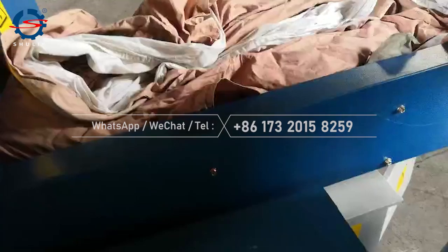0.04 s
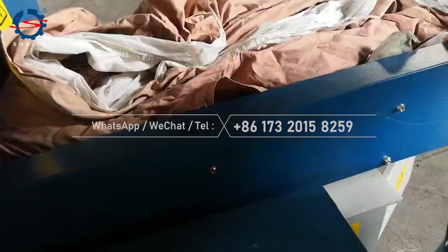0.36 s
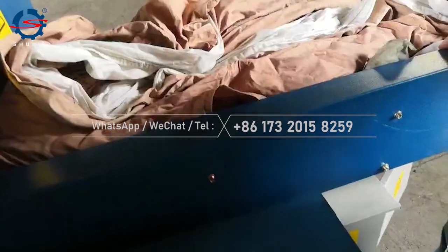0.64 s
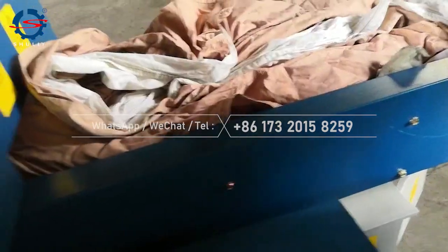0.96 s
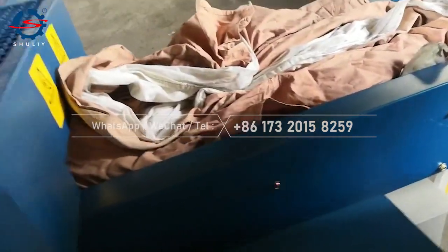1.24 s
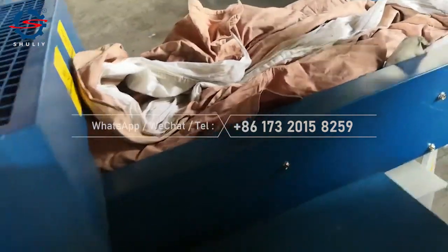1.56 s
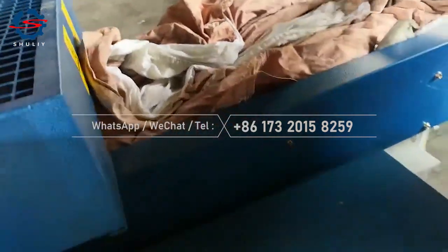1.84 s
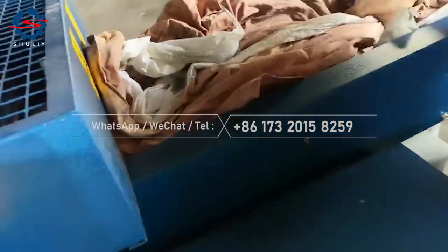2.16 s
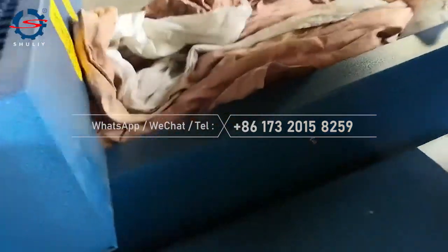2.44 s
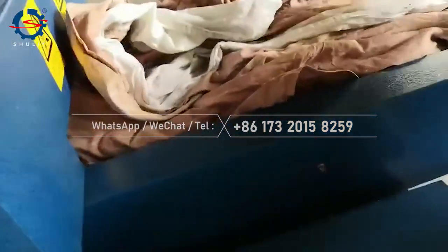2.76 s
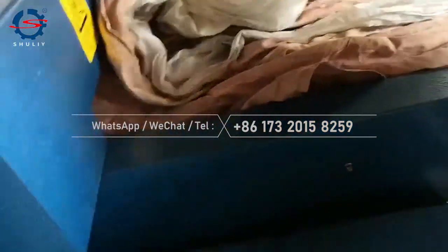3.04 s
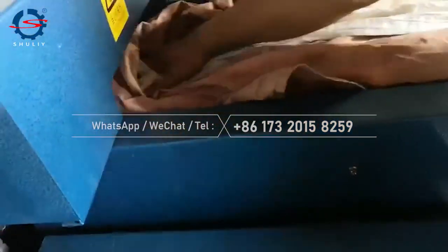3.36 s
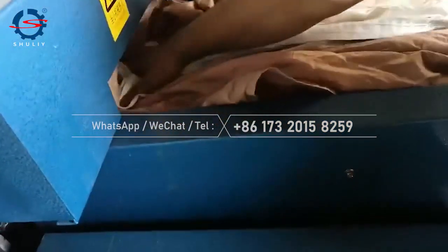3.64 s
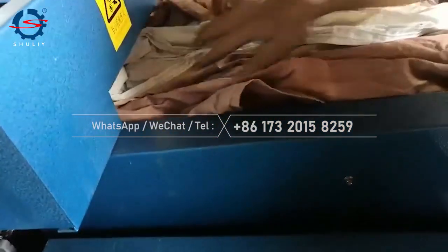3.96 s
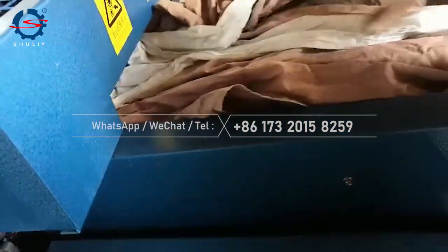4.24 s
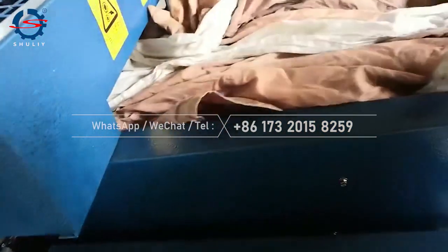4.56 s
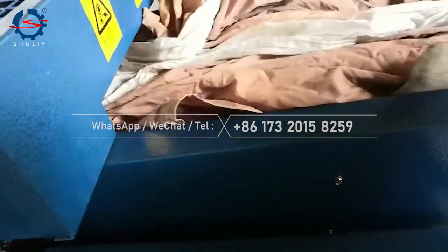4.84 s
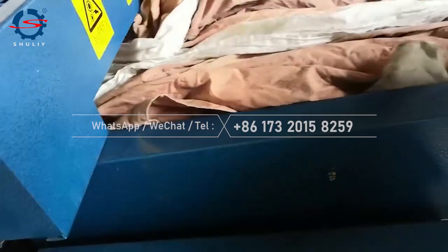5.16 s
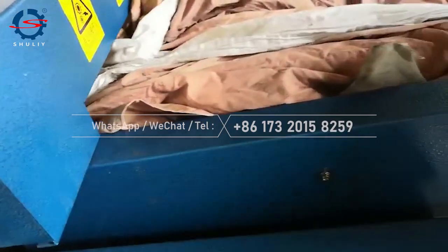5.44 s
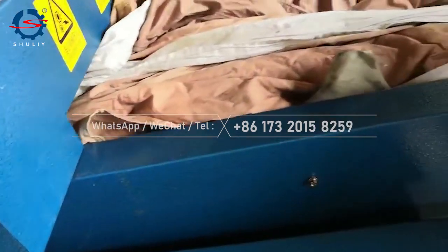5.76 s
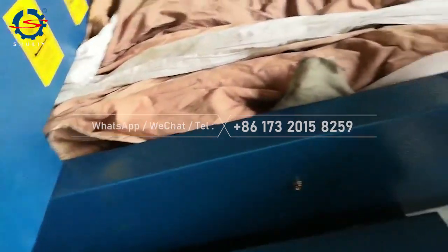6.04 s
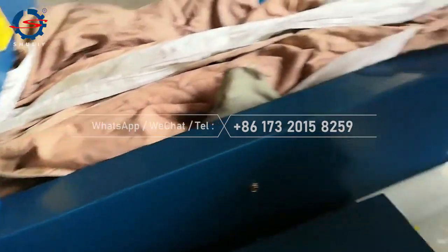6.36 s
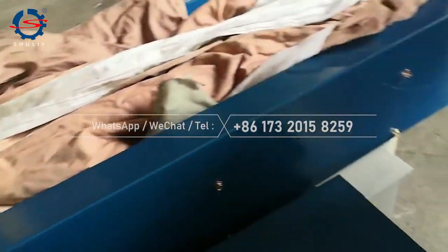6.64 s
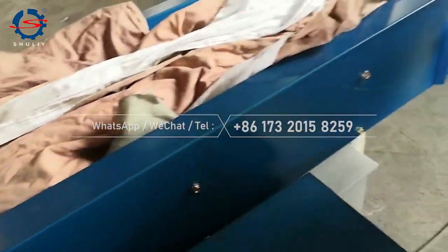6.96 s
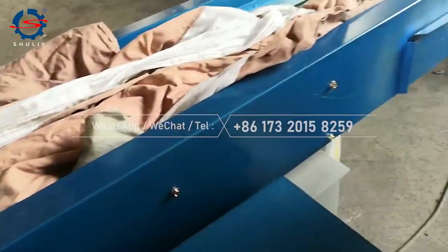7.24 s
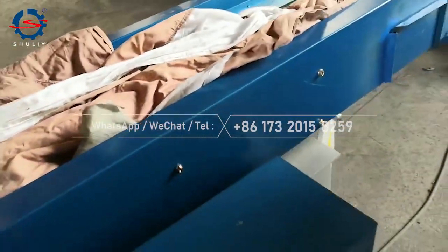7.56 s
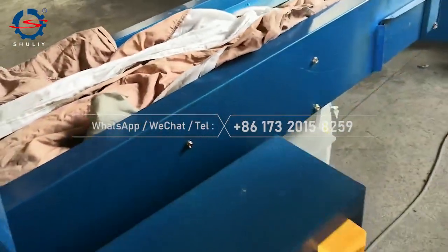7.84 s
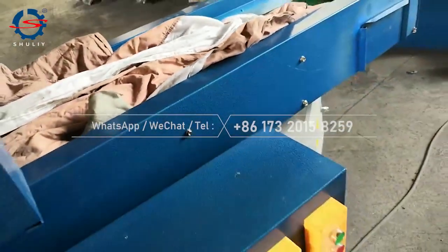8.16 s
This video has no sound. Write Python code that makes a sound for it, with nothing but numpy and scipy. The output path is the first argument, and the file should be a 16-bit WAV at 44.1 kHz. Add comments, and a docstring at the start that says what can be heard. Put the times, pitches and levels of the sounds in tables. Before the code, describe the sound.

Rapid, regular blade chops with a ringing scrape, over the rumble and gear clatter of a rag cutter in a workshop.

```python
"""A rag chopper rumbles and knocks in a workshop, its knife chopping almost four times a second.
The drive knocks six times a turn in the steel housing; gears and conveyor rattle much alike on every turn.
The rotating knife shears past the bed knife with a clunk and a scrape, and both blades ring.
Near the end a pulsing belt hiss comes close."""
import sys
import numpy as np
from scipy import signal
from scipy.fft import rfft, irfft
from scipy.io import wavfile
from scipy.ndimage import uniform_filter1d, minimum_filter1d

SR = 44100
rng = np.random.default_rng(int(sys.argv[2]) if len(sys.argv) > 2 else 0)


def generate_wav(sig):
    """Save sig (samples, or channels by samples) to the path in sys.argv[1] as 16-bit PCM at SR."""
    pcm = np.round(np.clip(np.atleast_2d(sig).T, -1, 1) * 32767).astype(np.int16)
    wavfile.write(sys.argv[1], SR, pcm)


N = 361179
TIME, FREQS = np.arange(N) / SR, np.fft.rfftfreq(N, 1 / SR)

# knife shaft, slowing slightly at the end: t/s, angle/turns
SHAFT_ANGLE = [(-.1323, 0), (7.0912, 28), (7.6095, 30), (8.396, 33)]
TURNS = np.interp(TIME, *np.transpose(SHAFT_ANGLE))
TURN_S = .258  # nominal period
CUT_TIMES_S = np.interp(np.arange(1, TURNS[-1]), TURNS, TIME)


def gain_of(db):
    """Decibels to amplitude."""
    return 10 ** (np.asarray(db) / 20)


def unit_rms(x):
    """Scales to rms 1."""
    return x / np.sqrt(np.mean(x ** 2) + 1e-20)


def along(points):
    """A (t/s, value) curve at every sample."""
    return np.interp(TIME, *np.transpose(points))


def spectrum(points):
    """Gain at every frequency from (f/Hz, level/dB) points."""
    hz, db = np.transpose(points)
    return gain_of(np.interp(np.log(FREQS + 1), np.log(hz), db))


def resonances(modes):
    """Response of (f/Hz, width/Hz, level/dB) modes, each radiating only around its own pitch."""
    response = 0
    for hz, width_hz, db in modes:
        detune = (FREQS + 1) / hz - hz / (FREQS + 1)
        response += gain_of(db) / ((1 + 1j * detune * hz / width_hz) * (1 + 2j * detune) ** 2)
    return response


def colour(x, response):
    """Filters by a frequency response."""
    return irfft(rfft(x) * response, N)


def slack(load_exponent=2.03, release_turns=.047):
    """Near 1 just after a cut, falling to 0 as the drive takes up load for the next."""
    angle = TURNS % 1
    return (1 - angle) ** load_exponent * np.minimum(angle / release_turns, 1)


def press(at_turns=.886, width_turns=.048):
    """Knife pressure on the cloth, 0-1: a short swell before each cut."""
    return np.exp(-((TURNS % 1 - at_turns) / width_turns) ** 2)


def throb(per_turn, lag_turns):
    """Cosine locked to the knife shaft."""
    return np.cos(2 * np.pi * per_turn * (TURNS - lag_turns))


def shaft_tone(hz, waver):
    """Wavering tone on the shaft harmonic nearest hz."""
    knots = np.linspace(0, TIME[-1], num=24)
    drift = np.array([np.interp(TIME, knots, row) for row in rng.standard_normal((2, len(knots)))])
    phase = 2 * np.pi * (round(hz * TURN_S) * TURNS + rng.random())
    return (1 + waver * drift[0]) * np.cos(phase) + waver * drift[1] * np.sin(phase)


def contact(repeat, wear_s=3, wobble_s=.00006):
    """Mid/side roughness of meeting parts; the power share `repeat` recurs each turn, slowly shifting."""
    size = round(TURN_S * SR)
    knots = TIME[::200]
    wobble = np.interp(TIME, knots, wobble_s * rng.standard_normal(len(knots)))
    angle = TURNS % 1 + wobble / TURN_S  # shaft wobble: the treble never repeats
    patterns = unit_rms(irfft(np.exp(2j * np.pi * rng.random((2, 2, size // 2 + 1))), size))
    first, second = patterns[..., (angle * size).astype(int) % size]
    recurring = first * np.cos(TIME / wear_s) + second * np.sin(TIME / wear_s)
    return np.sqrt(repeat) * recurring + np.sqrt(1 - repeat) * rng.standard_normal((2, N))


def room(x, t60_s, wet_db):
    """Adds a diffuse workshop tail to mid and side."""
    t = TIME[:SR]
    tail = rng.standard_normal((2, SR)) * gain_of(-60 * t / t60_s) * (t > .004)
    tail /= np.linalg.norm(tail[0])
    return x + gain_of(wet_db) * signal.fftconvolve(x[:1], tail, axes=1)[:, :N]


# stereo width: f/Hz, side minus mid/dB
SIDE_GAIN = [(60, -54), (110, -27), (200, -15), (370, -4.5), (600, -4), (1200, -1.5), (3500, -0.5),
             (14000, 1)]
def stereo(x):
    """Mid/side to left/right; the bass is nearly mono."""
    side = colour(x[1], spectrum(SIDE_GAIN))
    return np.array([x[0] + side, x[0] - side])


# hiss density: f/Hz, level/dB
BELT_SPECTRUM = [(110, -17), (180, 32.5), (240, -3), (320, 17.5), (700, 3), (1000, 8), (2200, 14.5),
                 (3200, -1.5), (5300, -1.5), (6800, -3), (9500, -4), (12000, -22.5), (15000, -30)]
# belt coming close: t/s, level/dB
BELT_GAIN = [(5.8, -66), (6.5, -53), (7.1, -30.5), (7.65, -23.5), (8.19, -23)]
# hiss surges: t/s, boost/dB, half length/s
BELT_SURGES = [(6.706, 21.5, 0.12), (7.782, 8, 0.022), (8.06, 5, 0.027)]
def belt(throb_db=1.5, uneven_db=2.7):
    """The belt hisses unevenly, swelling once per motor revolution; a few surges stand out."""
    slips = unit_rms(uniform_filter1d(rng.standard_normal(N), 500))
    swell = gain_of(throb_db * throb(per_turn=6, lag_turns=.024) + uneven_db * slips)
    hiss = unit_rms(colour(rng.standard_normal((2, N)), spectrum(BELT_SPECTRUM)) * swell)
    surges_db = sum(db * np.exp(-((TIME - at_s) / half_s) ** 2) for at_s, db, half_s in BELT_SURGES)
    return stereo(hiss) * gain_of(along(BELT_GAIN) + surges_db)


# panel drone: t/s, level/dB
DRONE_GAIN = [(1.7, -26), (2.6, -23), (3.3, -30.5), (4.3, -31.5), (5.4, -28), (6.5, -23.5), (7, -29.5),
              (8.1, -29.5)]
def side_panel(level_db=-.5, throb_db=3, limp_db=2.5, slack_db=-2.5):
    """A side panel drones in six beats a turn, alternately strong and weak."""
    drone = shaft_tone(310, waver=.35) + .55 * shaft_tone(318, waver=.6) + .45 * shaft_tone(302, waver=.6)
    beats_db = throb_db * throb(per_turn=6, lag_turns=-.0055)
    beats_db += limp_db * throb(per_turn=3, lag_turns=-.006)
    beating = unit_rms(drone * gain_of(beats_db + slack_db * slack()))
    return beating * gain_of(level_db + along(DRONE_GAIN)) * gain_of([[-.3], [.3]])


# gear and conveyor noise density: f/Hz, level/dB
RATTLE_SPECTRUM = [(200, -33), (450, -4.5), (650, 1.5), (930, 4.5), (1450, 0.5), (1750, 2.5), (1950, 3.5),
                   (2400, 5.5), (3200, -8), (4100, -14), (5500, -14), (6500, -19), (9000, -23),
                   (12000, -37.5), (15000, -50)]
# cover plate: f/Hz, width/Hz, level/dB
COVER_MODES = [(803, 14, -0.5), (850, 14, -3), (1011, 14, -1), (1732, 60, -1), (2438, 10, 2),
               (3460, 40, -14)]
# clatter, cover and rasp together: t/s, level/dB
GEARS_GAIN = [(.65, -22), (6.9, -22.5), (8, -20.5)]
def gears(clatter_db=-1, grain_db=.92, slack_db=-2.5, press_db=1.5, cover_db=-8.5, rasp_db=-15.5):
    """Teeth and conveyor links clatter, the cover rings; cloth rasps on the knife before each cut."""
    teeth = contact(repeat=1)
    bursts = unit_rms(uniform_filter1d(teeth[0], 130))
    drive = teeth * gain_of(grain_db * bursts + slack_db * slack() + press_db * press())
    clatter = gain_of(clatter_db) * unit_rms(colour(drive, spectrum(RATTLE_SPECTRUM)))
    rub = contact(repeat=.5)
    cover = gain_of(cover_db) * unit_rms(colour(rub, resonances(COVER_MODES)))
    rasp = gain_of(rasp_db) * unit_rms(colour(rub * press(), resonances([(1730, 210, 0)])))
    return stereo(clatter + cover + rasp) * gain_of(along(GEARS_GAIN))


# the six knocks of one knife turn: level/dB, f/Hz
DRIVE_KNOCKS = [(-37, 370), (-11.5, 280), (-8, 185), (-14.5, 200), (-15, 260), (-17.5, 340)]
def knocks(rise_s=.0031, uneven_db=.2, jitter_s=.00028, lead_turns=.016):
    """Play in the drive takes up once per motor revolution with a short dull thud; mid only."""
    t, mid = TIME[:4096], np.zeros(N)
    envelope = (t / rise_s) ** 2 * np.exp(2 * (1 - t / rise_s))
    for k, (db, hz) in enumerate(DRIVE_KNOCKS):
        at_turns = np.arange(TURNS[-1]) + (k + 1) / len(DRIVE_KNOCKS) - lead_turns
        late, weak = rng.standard_normal((len(at_turns), 2)).T
        times_s = np.interp(at_turns, TURNS, TIME) + jitter_s * late
        blows = np.zeros(N)
        blows[np.clip(times_s * SR, 0, N - 1).astype(int)] = gain_of(db - uneven_db * weak)
        thud = envelope * np.sin(2 * np.pi * hz * (t - rise_s))
        mid += signal.oaconvolve(blows, thud)[:N]
    return np.array([mid, np.zeros(N)])


# rumble density: f/Hz, level/dB
RUMBLE_SPECTRUM = [(20, -42), (38, -23), (55, -8.5), (68, -11), (82, -1.5), (112, -6), (175, -1),
                   (235, -3.5), (265, -5), (325, -2.5), (390, -12.5), (470, -16), (700, -25.5), (1500, -79)]
# tones kept up by the drive: nominal f/Hz, level/dB
HOUSING_TONES = [(93, -34.5), (139.5, -34.5), (170.5, -43), (213, -31), (232.5, -34.5), (415, -43.5),
                 (500, -40.5)]
# rumble, tones and knocks together: t/s, level/dB
HOUSING_GAIN = [(.65, -19.5), (3.2, -19), (6, -20), (7.3, -20.7), (7.8, -20)]
def housing(rumble_db=.5, tones_db=19.5, knocks_db=16.5, slack_db=-7.5):
    """The drive knocks in the sheet-steel housing and shakes it, hardest under load before each cut."""
    rumble = gain_of(rumble_db) * unit_rms(colour(contact(repeat=.74), spectrum(RUMBLE_SPECTRUM)))
    tones = sum(gain_of(db) * np.sqrt(2) * shaft_tone(hz, waver=1) for hz, db in HOUSING_TONES)
    rumble[0] += gain_of(tones_db) * tones
    thuds = colour(room(knocks(), t60_s=.087, wet_db=-12.5), spectrum([(70, -30), (150, 0)]))
    body = rumble * gain_of(slack_db * slack()) + gain_of(knocks_db) * thuds
    return stereo(body * gain_of(along(HOUSING_GAIN)))


def cut_force(hold_s, fall_s, bite_s=.0003):
    """One stroke per turn: the edges bite, slide and let go."""
    force, age = np.zeros(N + SR), TIME[:round(TURN_S * SR)]
    for at_s, slide_s in zip(CUT_TIMES_S, hold_s * np.ones(len(CUT_TIMES_S))):
        stroke = (1 - np.exp(-age / bite_s)) * np.exp(-np.maximum(age - slide_s, 0) / fall_s)
        force[round(at_s * SR):][:len(age)] += stroke
    return force[:N]


# cloth fed to the knife: t/s, thickness/0-1
CLOTH_THICKNESS = [(.65, 0.5), (1.4, 0.6), (2.7, 1), (2.97, 0.3), (4.8, 0.4), (6.1, 1), (7.35, .9),
                   (7.6, 0.1)]
# knife and bed knife: f/Hz, width/Hz, level/dB
BLADE_MODES = [(1012, 16, -11), (1282, 20, -7), (2165, 32, -1), (2235, 40, -6), (2290, 30, 0),
               (2375, 40, -2), (2438, 13, 4), (2550, 30, -5), (2722, 24, -5), (2830, 60, -11),
               (3460, 30, -18)]
# edge-on-edge noise density: f/Hz, level/dB
SCRAPE_SPECTRUM = [(400, -19), (900, -1), (1800, 2), (2300, 5), (2750, 8), (3200, -1), (4000, -7),
                   (5000, -7), (5900, -8), (6400, -15.5), (8000, -15), (10000, -19), (12000, -34),
                   (15000, -48)]
# ring and scrape: t/s, level/dB
BLADE_GAIN = [(.65, -11), (1.4, -12), (3.4, -12), (5.3, -11.5), (6.1, -10.5), (7.35, -11), (7.6, -14.5)]
# holder clunk: t/s, level/dB
CLUNK_GAIN = [(.65, -26), (2.4, -20), (4, -12), (6.6, -14), (8.1, -11.5)]
# knife position: t/s, left minus right/dB
KNIFE_BALANCE = [(1.1, 2.5), (2.1, -1), (3, 1.5), (5.3, 2.8), (6.4, -2.3), (7.5, 2.5)]
def knife(ring_db=-4, scrape_db=-5, clunk_db=-7, muffle_db=-2, thin_slide_s=.017, thick_slide_s=.029):
    """The edges meet with a hollow clunk, then hiss as they slide and set both blades ringing."""
    edge, level = contact(repeat=.55), gain_of(along(BLADE_GAIN))
    # thick cloth lengthens the slide and muffles the ring
    thickness = np.interp(CUT_TIMES_S, *np.transpose(CLOTH_THICKNESS))
    slide_s = thin_slide_s + (thick_slide_s - thin_slide_s) * thickness
    grind = cut_force(hold_s=slide_s, fall_s=.02) * level * gain_of(muffle_db * along(CLOTH_THICKNESS))
    blades = resonances(BLADE_MODES)
    ring = colour(edge * grind, blades / np.std(blades))
    blow = cut_force(hold_s=.006, fall_s=.005) * gain_of(along(CLUNK_GAIN))
    holder = resonances([(934, 103, 4), (1360, 160, -4.5), (2540, 480, -1.5)])
    clunk = colour(edge * blow, holder / np.std(holder))
    friction = cut_force(hold_s=.0092, fall_s=.024) * level
    scrape = colour(edge * friction, unit_rms(spectrum(SCRAPE_SPECTRUM)))
    cut = gain_of(ring_db) * ring + gain_of(scrape_db) * scrape + gain_of(clunk_db) * clunk
    pan_db = along(KNIFE_BALANCE)
    return stereo(room(cut, t60_s=.55, wet_db=-11)) * gain_of([pan_db / 2, -pan_db / 2])


# level between spaced microphones: f/Hz, left minus right/dB
STEREO_BALANCE = [(60, -0.5), (99, 0.0), (160, 0.5), (270, -0.5), (440, -2.5), (730, 2.5), (1190, -4),
                  (1970, -3.5), (3230, 3.5), (5330, -8), (8770, -2.5), (14400, 7)]
# phase between spaced microphones: f/Hz, left lead/rad
STEREO_PHASE = [(200, 0), (340, 0.14), (480, 2.03), (600, 2), (1100, 1.37), (1400, 0.8), (2000, 4.5),
                (2900, 3)]
def scene():
    """The machine reaches one of two spaced microphones louder and sooner, by frequency."""
    machine = knife() + housing() + side_panel() + gears() + belt()
    lead_rad = np.interp(FREQS, *np.transpose(STEREO_PHASE))
    left = np.sqrt(spectrum(STEREO_BALANCE)) * np.exp(.5j * lead_rad)
    return colour(machine, np.array([left, 1 / left]))


def record(dry, start_s=.49, rise_s=.002, overshoot_db=4.5, settle_s=.058, cutoff_hz=15200):
    """Silence, then an abrupt, briefly louder onset; peak limiter and low-pass."""
    age = np.maximum(TIME - start_s, 0)
    opened = dry * np.minimum(age / rise_s, 1) * gain_of(overshoot_db * np.exp(-age / settle_s))
    allowed_gain = 1 / np.maximum(abs(opened).max(0), 1)
    limited = opened * uniform_filter1d(minimum_filter1d(allowed_gain, size=129), size=129)
    lowpass = signal.firwin(511, cutoff_hz, window=("kaiser", 9), fs=SR)
    return signal.oaconvolve(limited, lowpass[None], "same")


dry = scene()
out = record(dry)
generate_wav(out)
```